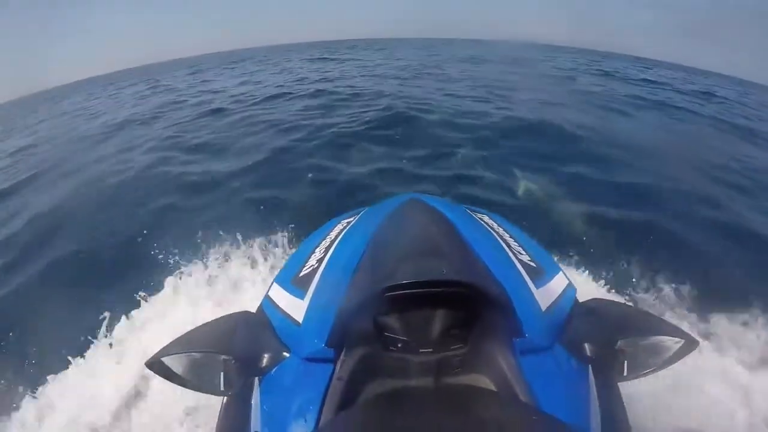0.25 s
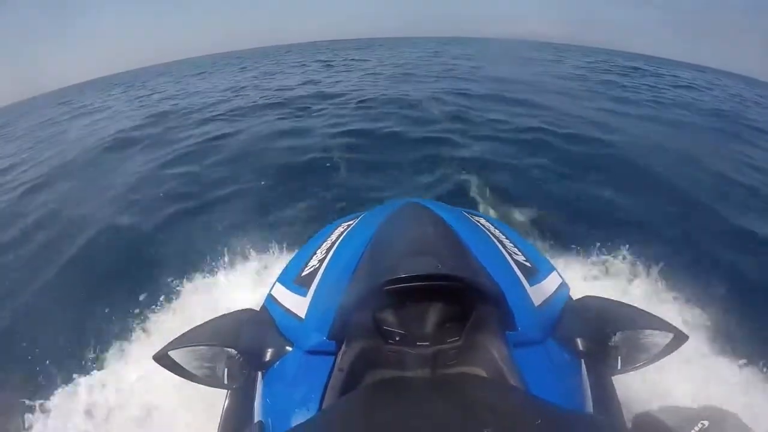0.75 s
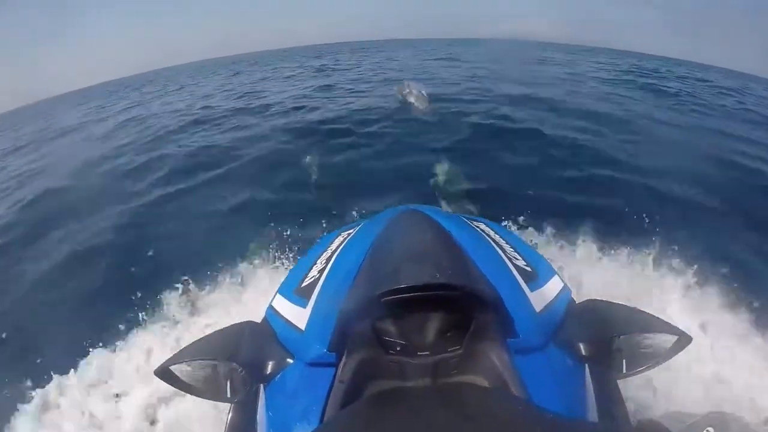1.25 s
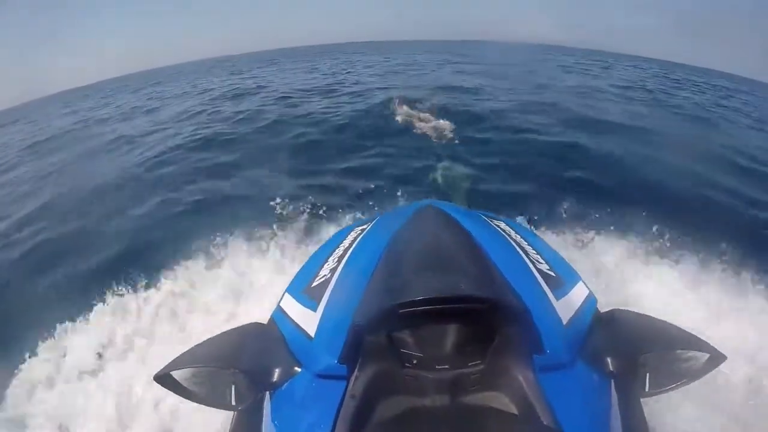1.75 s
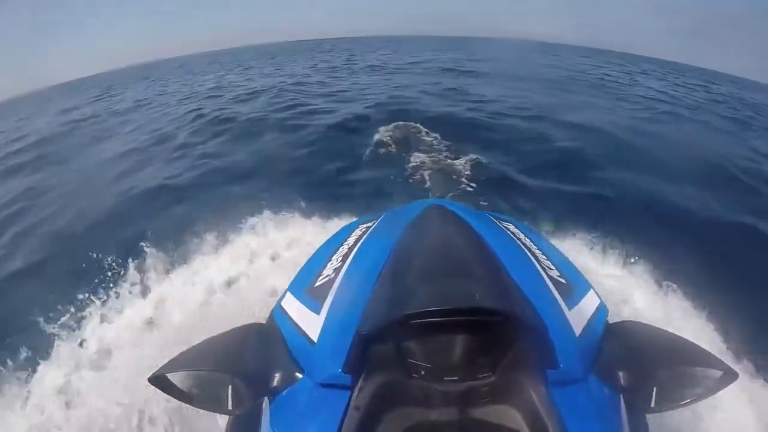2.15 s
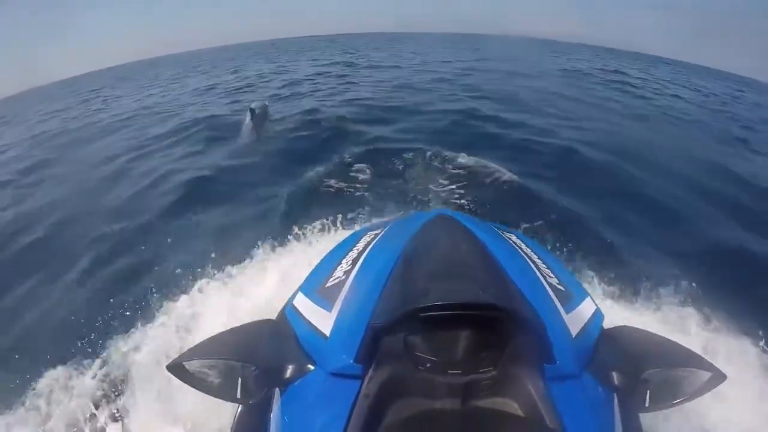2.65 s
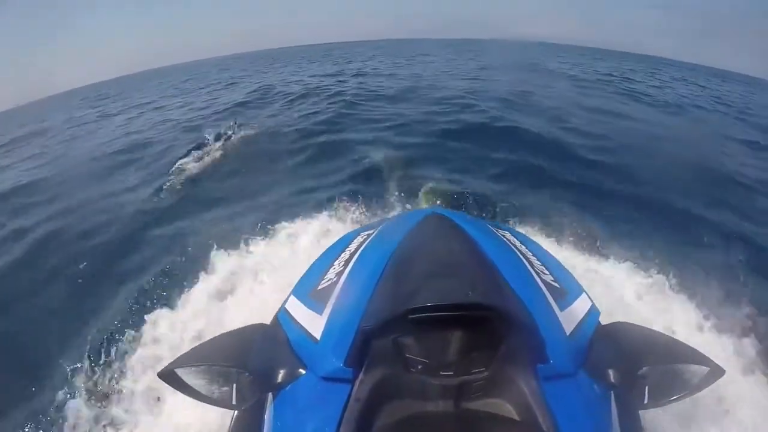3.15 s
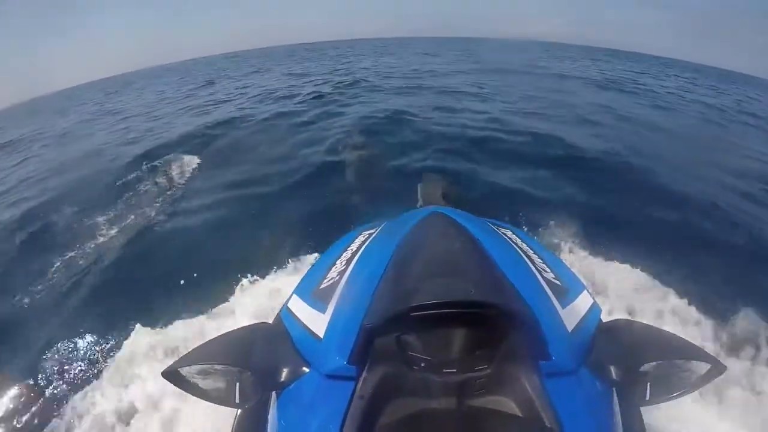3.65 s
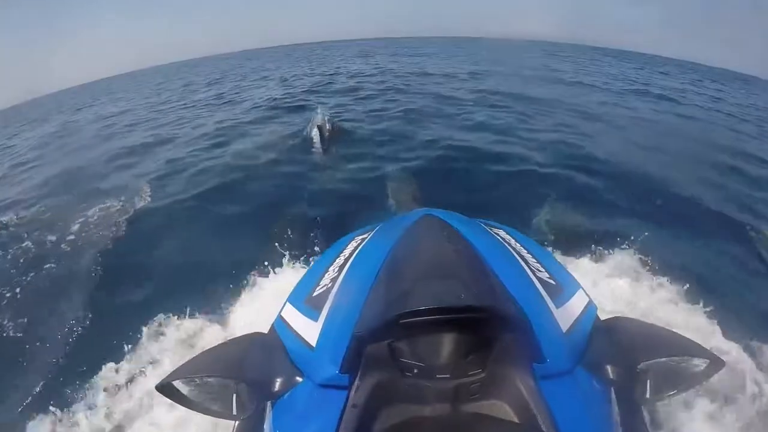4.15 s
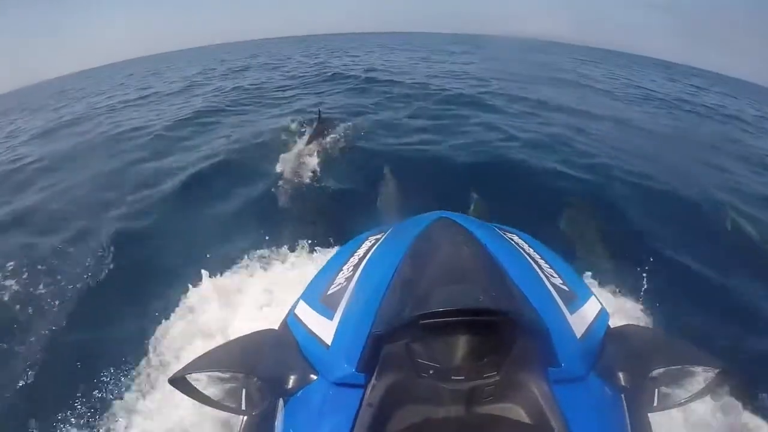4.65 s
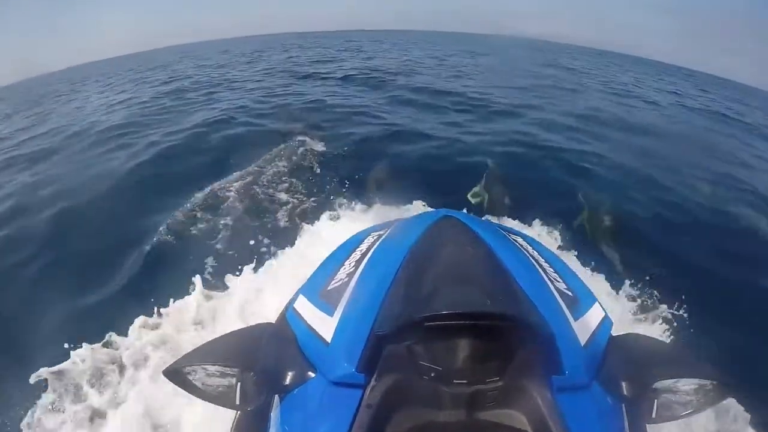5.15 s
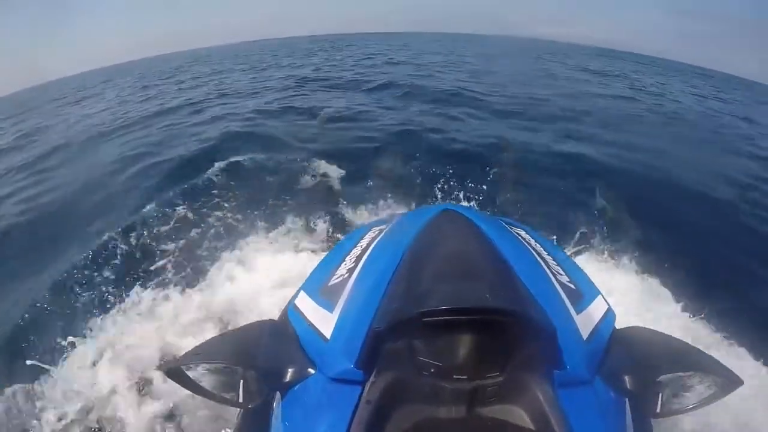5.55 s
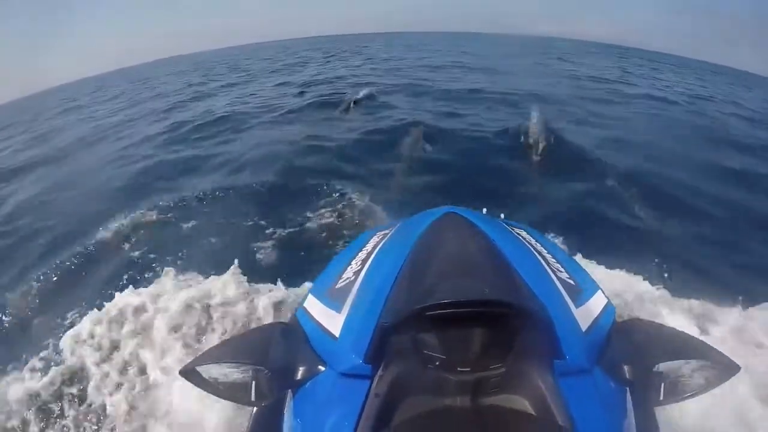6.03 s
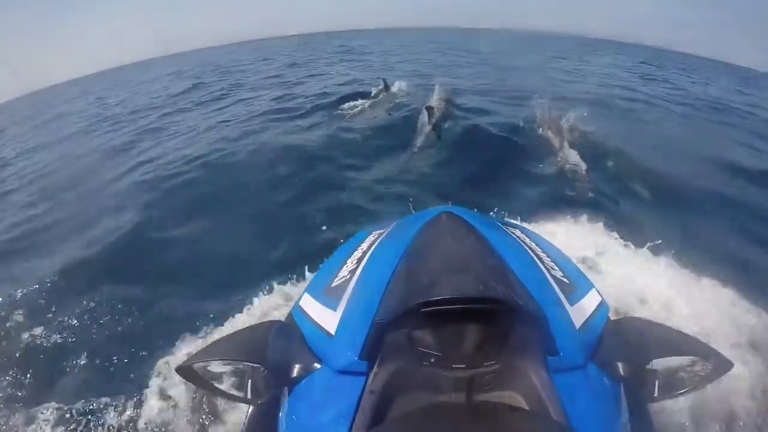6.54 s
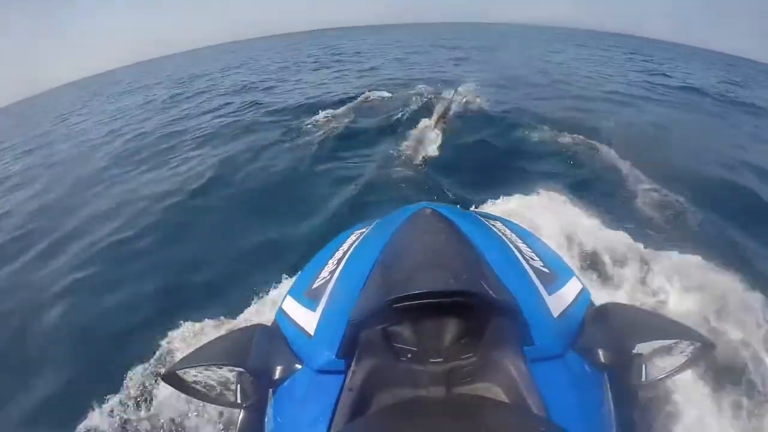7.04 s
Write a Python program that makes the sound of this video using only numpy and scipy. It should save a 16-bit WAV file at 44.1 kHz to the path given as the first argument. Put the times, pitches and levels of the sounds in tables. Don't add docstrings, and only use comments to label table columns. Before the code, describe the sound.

Aboard a jet ski on open sea, the microphone is sealed in a small waterproof case, giving a close, dry, boxy sound. A deep, nearly pure exhaust drone dominates, around 131 Hz at first, then slides down between 0.9 and 1.3 s to about 108 Hz as the throttle eases, briefly rougher and uneven. It hovers near 102-108 Hz afterwards, with small flares and pounding swells. Much quieter bow spray hisses continuously, coarse and fast at first, surging with waves, notably around 1.4-2.5, 3.0 and 5.4 s, and thinning from 4.2 s. Wash gurgles, water drums under the hull, low wind buffets. Faint drop ticks and bubbly plinks appear near 1.6, 2.2, 3.4 and 4.5-4.9 s. From 4.75 s the drone sags and partly recovers around 6 s; from 6.5 s to the end at about 7.3 s it is strongly choked, weak and fluttering, as spray picks up and more drops blip.

```python
import sys
import numpy as np
from scipy import signal
from scipy.fft import rfft, irfft, next_fast_len
from scipy.io import wavfile
from scipy.ndimage import uniform_filter1d, map_coordinates

SR = 44100
rng = np.random.default_rng(int(sys.argv[2]) if len(sys.argv) > 2 else 0)


def gain_from_decibels(decibels):
    exponent = np.asarray(decibels, float) / 20
    return 10 ** exponent


def wav_out(sig):
    wavfile.write(sys.argv[1], SR, np.round(np.clip(np.atleast_2d(sig).T, -1, 1) * 32767).astype(np.int16))


N = 321489

# (time [s], firing rate [Hz])
ENGINE_SPEED = [(0, 133.8), (.9, 130.9), (1.05, 123.7), (1.3, 109), (1.5, 107.3), (1.82, 108),
                (2.15, 105.5), (2.7, 103.1), (3.05, 105), (3.42, 101.5), (4.1, 102.6), (4.3, 101.6),
                (4.75, 101.8), (5.3, 105.7), (5.6, 103.4), (6.0, 104.5), (6.25, 106.9), (7.29, 108.2)]
# (time [s], length [s], change [Hz])
ENGINE_FLARES = [(.15, .2, 1), (.4, 0.11, -1), (.62, .12, 0), (2.42, 0.092, 1.7), (4.5, 0.13, 1.8),
                 (4.93, 0.181, 3.5), (5.88, .13, 2.5), (6.7, 0.092, 1), (6.9, 0.14, 1.7),
                 (7.0, 0.058, -0.8), (7.2, 0.15, 2)]
# (start [s], length [s], loss [dB])
OUTLET_CHOKES = [(.52, 0.22, 3), (1.3, 0.26, 0.33), (2.55, 0.61, 1.1), (3.75, 0.49, 0.9), (4.75, 1.33, 4.5),
                 (4.85, 0.34, 4.5), (5.181, .15, 1.5), (5.816, 0.16, 4.5), (6.08, 0.59, 2.3),
                 (6.366, 0.059, 3), (6.48, .06, 2.5), (6.573, 0.93, 7), (6.6, .12, 6), (6.763, 0.1, 7.5),
                 (6.953, .12, 3), (7.133, 0.063, 5.5), (7.27, 0.096, 7)]
# (time [s], length [s], change [dB])
HULL_THROBS = [(.1, 0.27, 3), (.87, 0.2, -8), (1.2, .4, 7.5), (1.8, 0.84, 12.5), (3.0, 0.29, 9),
               (4.57, .2, 10), (4.92, 0.22, 11.5), (5.33, .2, 8), (5.87, 0.14, 8), (6.12, .12, 8.5),
               (6.47, 0.16, 10), (6.95, .3, 10), (7.29, 0.14, 9)]
# (time [s], length [s], change [dB])
JET_BARKS = [(.12, 0.2, 7.5), (.5, .15, 1.5), (.85, .2, 0), (1.38, 0.25, 3), (1.87, 0.59, 4.5),
             (2.5, 0.39, 8), (2.78, 0.11, -2.5), (3.15, 0.3, 2.5), (3.52, 0.26, -10.5), (3.95, 0.25, 1.5),
             (4.72, 0.39, 7), (5.0, 0.37, 6), (5.65, 0.22, -9), (5.85, 0.13, -2), (6.2, .25, 0.5),
             (6.42, .12, -4), (6.63, .1, 3), (6.71, 0.054, -8), (6.83, 0.11, -3), (6.95, 0.094, 4),
             (7.15, 0.36, -6.5)]
# (multiple of firing rate [1], level [dB])
UNEVEN_ORDERS = [(.5, -53), (1.5, -47.5), (2.5, -57.5), (3.5, -60)]
# (time [s], length [s], change [dB])
CYLINDER_STUMBLES = [
    (1.15, 0.33, 9),
    (1.65, 0.63, 6.5),
    (6.45, 0.27, 9),
]

# (time [s], hiss level [dB], coarseness [dB])
WATER_FLOW = [
    (0, -47.5, 1),
    (.7, -49, -0.3),
    (1.6, -49, -.5),
    (3.3, -49, -0.3),
    (4.2, -52, -.3),
    (4.8, -52.5, -1),
    (5.15, -54, -.5),
    (6.05, -54.5, -0.5),
    (6.5, -52, 0.5),
    (7.29, -52, 1),
]
# (time [s], length [s], surge [dB])
BOW_WAVES = [(.03, 0.083, 4), (.23, 0.076, 3), (.43, 0.094, 3.5), (.74, .12, 4.5), (.96, 0.15, 3.5),
             (1.11, 0.067, -1.5), (1.24, 0.15, 2.5), (1.41, 0.12, 6), (1.77, 0.2, 7.5), (2.17, 0.24, 4.5),
             (2.48, 0.17, 5), (2.76, 0.049, 0), (3.02, 0.27, 5), (3.3, 0.17, 2), (3.52, 0.098, 2),
             (3.85, .15, 1), (4.07, .1, 1), (4.48, .15, 3), (5.4, 0.17, 8.5), (5.66, 0.17, 3.5),
             (6.36, .15, 1), (6.78, 0.14, 2)]
# (time [s], length [s], change [dB])
AIR_GURGLES = [(.3, 0.13, 3), (.52, .1, 2.5), (.69, 0.045, 2.5), (1.04, .06, 3), (1.15, .08, -3),
               (1.5, 0.2, 2.5), (1.64, .07, -5), (2.33, 0.048, 3.5), (2.5, .15, 1.5), (2.78, .2, -2.5),
               (3.35, .12, 2.5), (3.75, 0.061, 3.5), (3.89, .05, 5), (4.68, .05, -2.5), (4.73, .04, 5),
               (5.5, 0.4, 5.5), (5.95, 0.11, -1), (6.19, .06, -0.5), (6.33, .08, 3), (6.62, 0.17, 4.5),
               (7.27, .1, 4)]
# (frequency [Hz], level per Hz [dB])
WASH_SPECTRUM = [(400, -37.5), (520, -4.5), (800, -12.5), (1000, -0.5), (1120, 3), (1250, -4),
                 (1500, -28.5)]
# (frequency [Hz], level per Hz [dB])
FOAM_SPECTRUM = [(500, -28), (750, -8), (1400, -3), (2000, -1.5), (2500, -0.5), (3000, -8), (3800, -30)]
# (frequency [Hz], level per Hz [dB])
HISS_SPECTRUM = [(2000, -29), (2600, -1), (3800, -1), (4600, -11), (5600, -12.5), (6500, -29.5),
                 (8000, -35.5)]
# (frequency [Hz], level per Hz [dB])
MIST_SPECTRUM = [(4500, -30), (6000, -2.5), (7000, -5), (10000, -9), (13000, -13), (14600, -13),
                 (15100, -16), (15500, -25.5), (16500, -53)]
# (centre [Hz], width [Hz], gain [dB])
CASE_RESONANCES = [(651, 38, 6.5), (1095, 145, 3), (2343, 67, 3), (2660, 250, -9), (2780, 110, 2.5),
                   (3820, 170, 0.5), (4336, 78, 6), (4960, 350, 4.5), (5160, 120, 0.5), (6070, 320, 4.5),
                   (6970, 700, -3), (8000, 740, 5.5), (10380, 440, 3.5)]

# (frequency [Hz], level per Hz [dB])
BUFFET_SPECTRUM = [(8, -33), (18, -0.5), (26, 0), (36, -4), (50, -6), (70, -3), (90, -6), (120, -8.5),
                   (200, -47)]
# (time [s], length [s], change [dB])
WIND_GUSTS = [(.38, .08, -6), (1.32, .12, 6), (1.46, .12, -11), (1.62, .06, -12), (1.7, .1, 5),
              (2.8, .08, 4), (4.55, 0.079, 10), (4.66, .12, -11.5), (5.03, .1, 6), (5.47, .1, -10),
              (5.66, 0.22, 2.5), (6.29, 0.091, 6), (6.54, .1, 9), (6.83, .1, 9), (7.2, .2, 3.5)]
# (frequency [Hz], level per Hz [dB])
HULL_SPECTRUM = [(70, -44), (110, -9), (150, -1.5), (200, -2), (260, -1.5), (380, -4.5), (450, -13.5),
                 (600, -29.5), (800, -49)]
# (time [s], length [s], change [dB])
HULL_SLAPS = [(.2, 0.14, -4.5), (.95, 0.13, -1), (1.25, 0.24, 2), (1.6, .1, 2), (2.65, .12, 3),
              (4.3, .4, -3), (4.55, .1, -3.5), (4.65, .1, 3), (5.05, .08, -4), (5.85, 0.27, -3),
              (6.4, .25, 3), (6.85, 0.14, -3), (7.2, .12, 2.5)]
# (time [s], peak level [dB], ring [Hz], ring t60 [s], tick re ring [dB])
CASE_DROPS = [(1.556, -37.5, 501, 0.083, -32), (1.58, -37, 670, 0.026, -30), (2.2, -35, 3724, 0.017, -10),
              (3.363, -40, 3720, 0.017, -11), (3.408, -33.5, 5040, .012, -1.5),
              (4.52, -36, 1749, 0.041, -14.5), (4.612, -43, 7800, .012, 0), (4.64, -43, 5600, 0.022, -6),
              (4.763, -45.5, 8200, 0.016, -16), (4.828, -36, 6400, 0.0061, 0.5),
              (4.867, -45.5, 7240, 0.024, -5), (4.895, -48, 8000, 0.025, -13), (6.466, -35, 1196, .05, -30),
              (6.526, -37, 1050, 0.042, -30), (6.59, -40, 1500, 0.049, -35), (6.783, -42, 1773, .06, -40),
              (6.838, -41, 1787, 0.047, -30)]

SLOW_HZ = 103
MEAN_FLOW_DB = -51


def unit(x):
    return x / np.sqrt(np.mean(np.abs(x) ** 2) + 1e-20)


def curves(rows):
    times, *columns = np.transpose(rows)
    return [np.interp(np.arange(N) / SR, times, column) for column in columns]


def wobble(rate):
    knots = rng.standard_normal(int(N * 200 / SR) + 4)
    return map_coordinates(knots, [np.arange(N) * rate / SR])


def slowly(shape):
    t = np.arange(0, N / SR + .002, .002)
    return np.interp(np.arange(N) / SR, t, shape(t))


def swells(rows, lingers=1):
    def total(t):
        level = np.zeros(len(t))
        for centre, length, size in rows:
            stretch = np.where(t > centre, lingers, 1)
            level += size * np.exp(-(2 * (t - centre) / length / stretch) ** 2)
        return level
    return slowly(total)


def soft_step(x):
    return .5 + .5 * np.tanh(x)


def shaped(x, gain_db):
    m = next_fast_len(N + 8192)
    hz = np.fft.rfftfreq(m, 1 / SR)
    return irfft(rfft(x, m) * gain_from_decibels(gain_db(hz)), m)[:N]


def firing():
    return curves(ENGINE_SPEED)[0] + swells(ENGINE_FLARES)


def choke_db():
    cover_s, clear_s = .03, 0.012

    def loss(t):
        return sum(db * soft_step((t - start) / cover_s) * soft_step((start + length - t) / clear_s)
                   for start, length, db in OUTLET_CHOKES)
    return slowly(loss)


def engine():
    firing_hz = firing()
    faster, lost_db = firing_hz - SLOW_HZ, choke_db()

    first_db = -14 - 5 * soft_step((firing_hz - 127.8) / 2.8) - lost_db
    second_db = -49.5 + .35 * faster + swells(HULL_THROBS)
    third_db = -36 - 0.4264 * faster - .3 * lost_db + swells(JET_BARKS)
    panel_hz, panel_width_hz, panel_db = 404.7, 16, 12.5
    fourth_db = -64 + panel_db / (1 + (2 * (4 * firing_hz - panel_hz) / panel_width_hz) ** 2)

    choke = np.clip((-13.0 - first_db) / 12, 0, 1)
    turn = 2 * np.pi * np.cumsum(firing_hz) / SR + (0.028 + 0.1 * choke) * wobble(35)
    drone = gain_from_decibels(first_db + (.4 + .6 * choke) * wobble(55)) * np.sin(turn)
    drone += gain_from_decibels(second_db + 1.8 * wobble(18)) * np.sin(2 * turn + 1.5 + .5 * wobble(14))
    drone += gain_from_decibels(third_db + 1.2 * wobble(18)) * np.sin(3 * turn - .8 + .3 * wobble(14))
    drone += gain_from_decibels(fourth_db + 2.1 * wobble(17)) * np.sin(4 * turn + 0.98 * wobble(11))

    stumble_db = swells(CYLINDER_STUMBLES)
    for order, db in UNEVEN_ORDERS:
        order_db = db - 0.35 * faster + stumble_db * (order - .5) / 2 + 2.3 * wobble(5)
        drone += gain_from_decibels(order_db) * np.sin(order * turn + 0.43 * wobble(7))
    return np.sqrt(2) * drone


def case_db(hz):
    return sum(db / (1 + (2 * (hz - centre) / width) ** 2) for centre, width, db in CASE_RESONANCES)


def rush(spectrum, patchy_db, crackle):
    density = .02
    grains = rng.standard_normal(N) * (rng.random(N) < density) / np.sqrt(density)
    z = signal.stft(rng.standard_normal(N) + crackle * grains, nperseg=512)[2]
    field = uniform_filter1d(rng.standard_normal(z.shape), size=8, axis=0)
    patches = unit(uniform_filter1d(field, size=10, axis=1))
    noise = signal.istft(z * gain_from_decibels(patchy_db * patches), nperseg=512)[1][:N]
    f, db = np.transpose(spectrum)

    def colour(hz):
        return np.interp(np.log(hz + 1), np.log(f + 1), db, -120, -120) + case_db(hz)
    return unit(shaped(noise, colour))


def spray():
    hiss_db, coarse_db = curves(WATER_FLOW)
    flow_db = hiss_db - MEAN_FLOW_DB
    wave_db = swells(BOW_WAVES, lingers=1.77)
    gurgle_db = swells(AIR_GURGLES)

    def follow(db, flow, wave, coarse):
        return gain_from_decibels(db + flow * flow_db + wave * wave_db + coarse * coarse_db + 0.23 * wobble(9))

    lumpy = unit(gain_from_decibels(1.45 * wobble(36)) * rush(WASH_SPECTRUM, patchy_db=0.84, crackle=0.64))
    wash = follow(0, flow=0.85, wave=0.22, coarse=0.59) * gain_from_decibels(gurgle_db) * lumpy
    foam = follow(0.98, flow=0.77, wave=0.63, coarse=0.89) * gain_from_decibels(0.27 * gurgle_db)
    foam *= rush(FOAM_SPECTRUM, patchy_db=0.6, crackle=0.35)
    hiss = gain_from_decibels(flow_db + wave_db) * rush(HISS_SPECTRUM, patchy_db=0.97, crackle=0.47)
    mist = follow(-8, flow=1.29, wave=0.91, coarse=-1.3) * rush(MIST_SPECTRUM, patchy_db=1.0, crackle=0.46)
    surge_db = MEAN_FLOW_DB + 0.24 * wobble(14) + 0.39 * wobble(60)
    return gain_from_decibels(surge_db) * (wash + foam + hiss + mist)


def wind():
    buffet_db = -41 + 0.1224 * (firing() - SLOW_HZ) + swells(WIND_GUSTS)
    lumps = gain_from_decibels(1 * wobble(8.9))
    return gain_from_decibels(buffet_db) * unit(lumps * rush(BUFFET_SPECTRUM, patchy_db=-0.6, crackle=0))


def hull():
    drum_db = -41.5 + 0.1522 * (firing() - SLOW_HZ) + 0.11 * choke_db() + swells(HULL_SLAPS)
    return gain_from_decibels(drum_db + 0.74 * wobble(8.9)) * rush(HULL_SPECTRUM, patchy_db=0.5, crackle=0)


def drops():
    out, t = np.zeros(N + SR), np.arange(SR // 10) / SR
    for start, db, hz, t60, tick_db in CASE_DROPS:
        rising = np.sin(2 * np.pi * hz * t * (1 + 0.075 * t / t60))
        ring = gain_from_decibels(-60 * t / t60) * (1 - np.exp(-t * hz / 0.84)) * rising
        click = np.convolve(rng.standard_normal(len(t)), [0.32, 0.37, -0.63, -.5], "same")
        tick = gain_from_decibels(tick_db - 60 * t / .004) * click
        out[round(start * SR):][:len(t)] += gain_from_decibels(db) * (ring + tick)
    return shaped(out[:N], lambda hz: -14 * (hz / 10000) ** 4)


def scene():
    return (engine() + spray() + wind() + hull() + drops())[None]


def band_limit(x):
    return signal.sosfilt(signal.butter(12, 15340, fs=SR, output="sos"), x)


def record(dry):
    hz, _, z = signal.stft(dry, SR, nperseg=1024)
    hz = hz[:, None]
    level = uniform_filter1d(uniform_filter1d(np.abs(z), size=2, axis=1), size=4, axis=2)
    floor_db = -97 + 8 * (hz / 15350) ** 50
    kept = (level > gain_from_decibels(floor_db)) | (hz < 10500)
    thinned = signal.istft(z * kept, SR, nperseg=1024)[1][:, :N]
    return band_limit(thinned)


dry = scene()
out = record(dry)
wav_out(out)
```